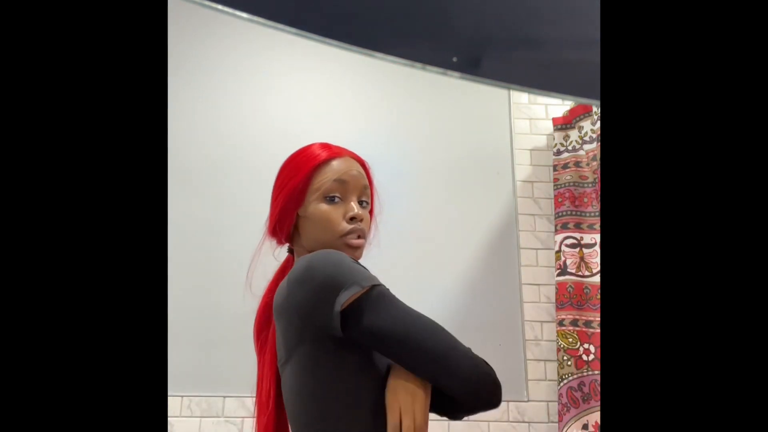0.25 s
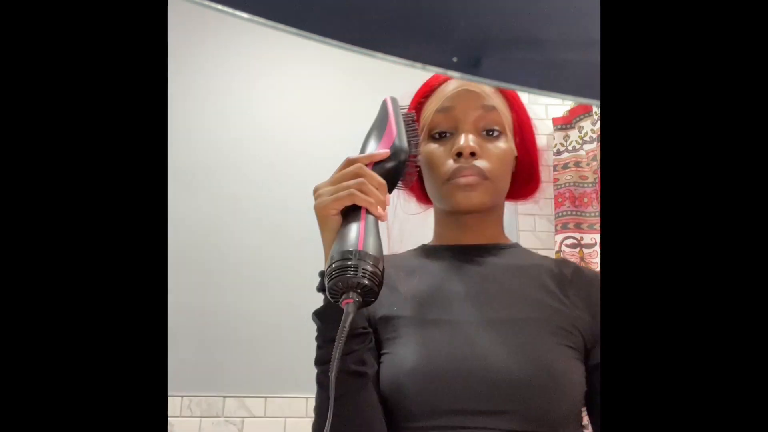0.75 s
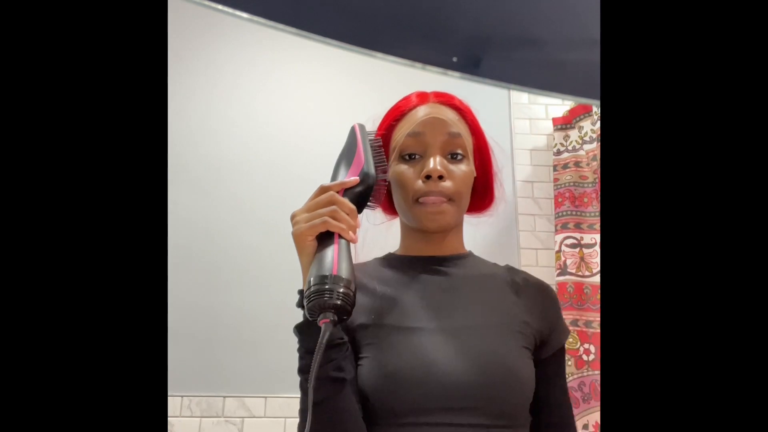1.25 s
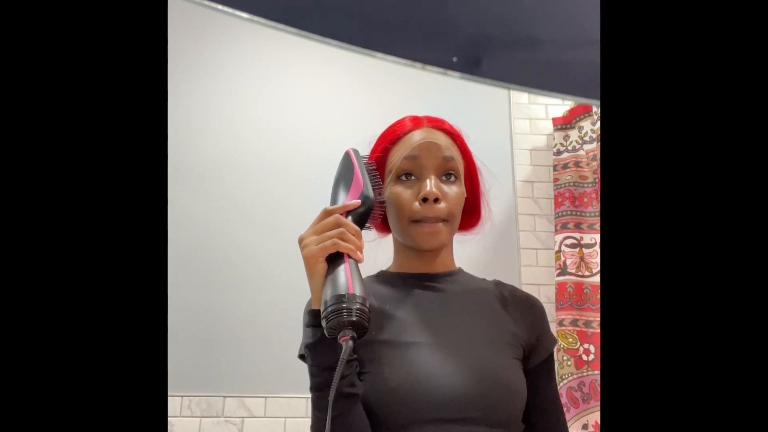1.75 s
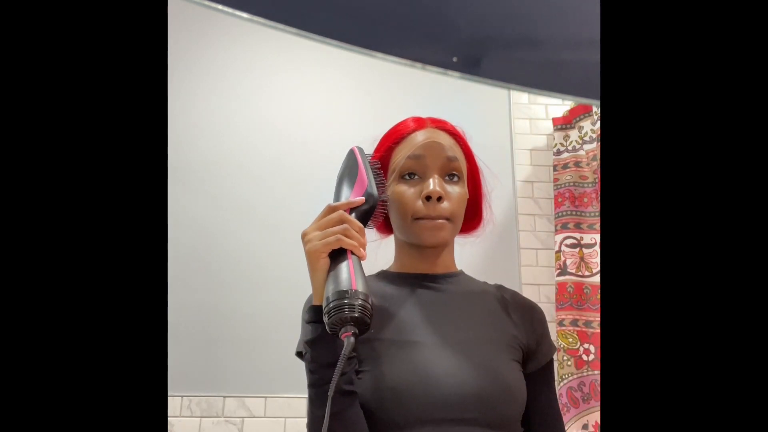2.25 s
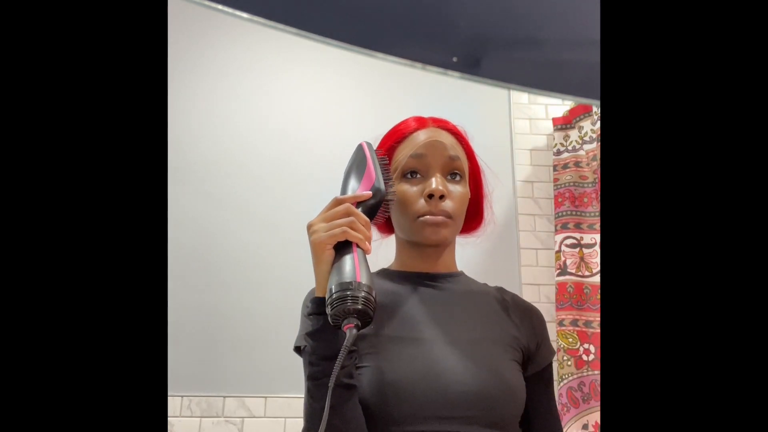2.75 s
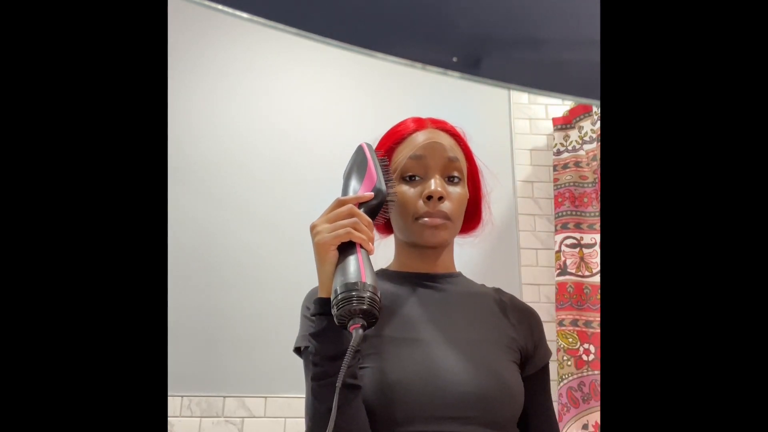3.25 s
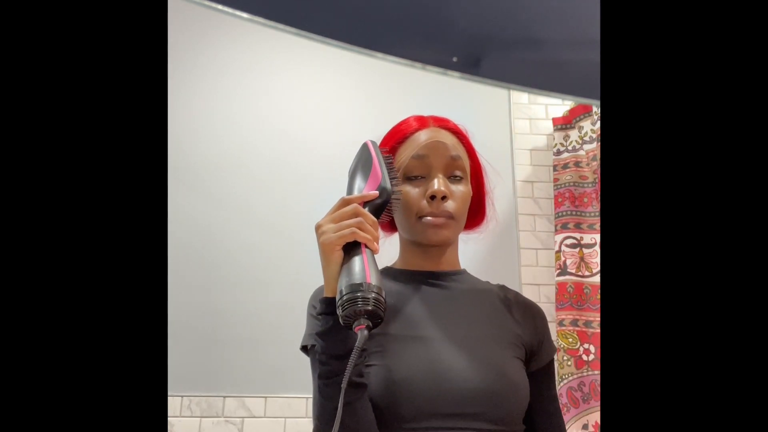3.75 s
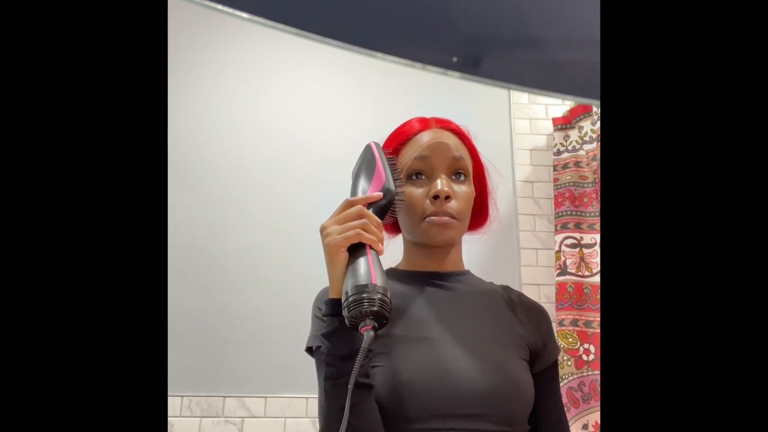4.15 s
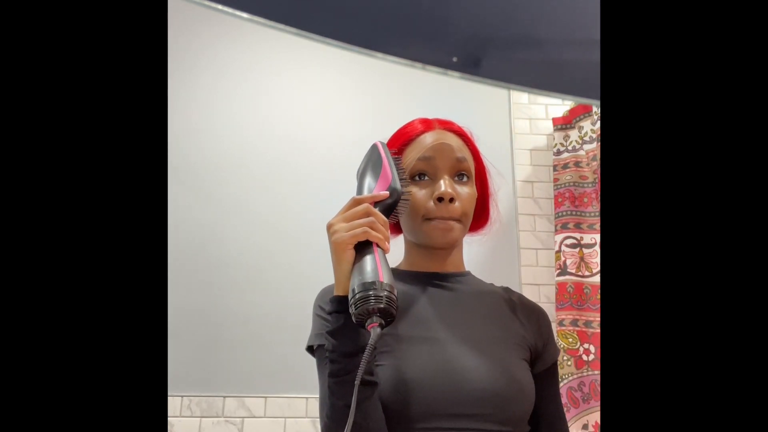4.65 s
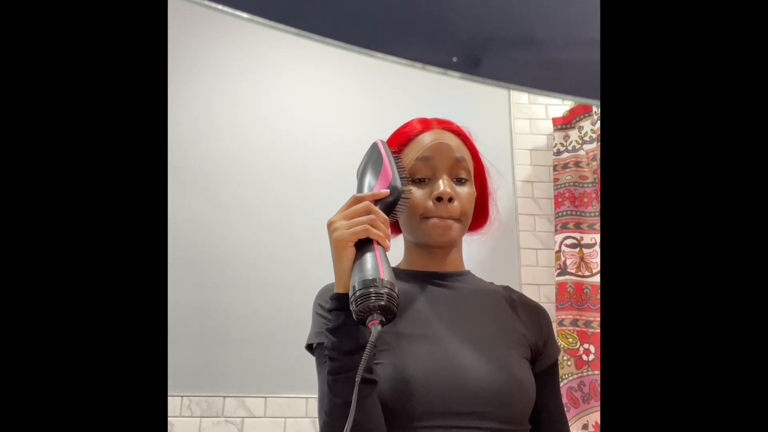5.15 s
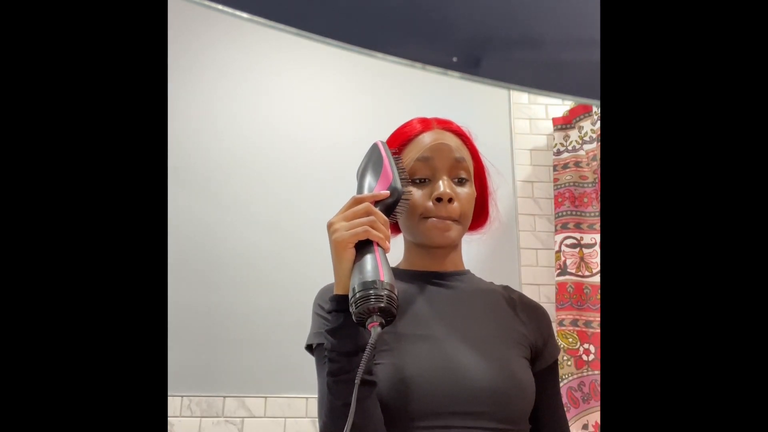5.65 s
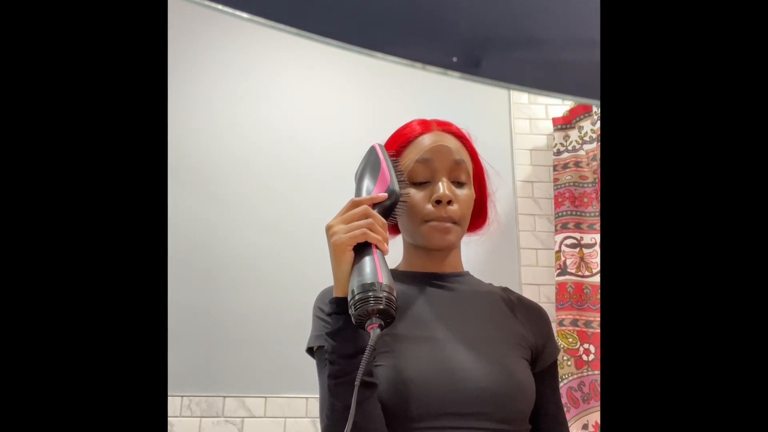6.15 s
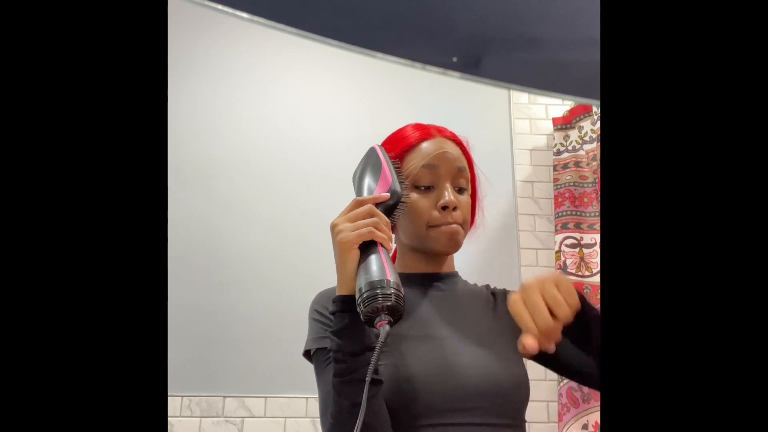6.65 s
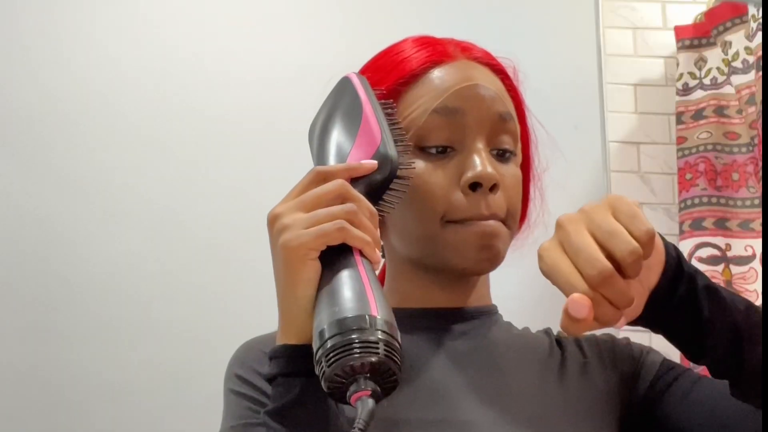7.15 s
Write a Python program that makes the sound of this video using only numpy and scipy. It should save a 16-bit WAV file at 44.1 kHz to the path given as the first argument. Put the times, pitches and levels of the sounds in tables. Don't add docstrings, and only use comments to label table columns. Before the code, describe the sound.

From 0 to about 0.8 s a small tiled bathroom is very quiet: low rumble, a dull murmur off the walls, a faint distant fan hum, a sleeve rubbing around 0.1-0.3 s, and soft handling knocks near 0.3 and 0.5 s. At 0.8 s the sound dips and cuts sharply to a hot air brush already running, vastly louder, about a metre from a stereo microphone. Broad turbulent air, strongest around 2-4 kHz, rushes steadily with slight flutter and hollow, tiled colouring. A motor tone near 515 Hz, a midrange overtone and a blade whine near 3.6 kHz ride on it, wavering slightly. The whine sharpens after 1.2 s; a higher tone flares around 1.4 and 6 s. From about 6 to 6.9 s the blade whine recedes as the brush turns, then partly returns. Blowing continues through the end, about 7.4 s.

```python
import sys
import numpy as np
from scipy import signal
from scipy.io import wavfile
from scipy.ndimage import uniform_filter1d

SR = 44100
rng = np.random.default_rng(int(sys.argv[2]) if len(sys.argv) > 2 else 0)


def decibels_to_gain(level_db):
    exponent = np.asarray(level_db, float) / 20
    return 10 ** exponent


def inscribe(sig):
    pcm = np.round(np.clip(np.atleast_2d(sig).T, -1, 1) * 32767)
    wavfile.write(sys.argv[1], SR, pcm.astype(np.int16))


N = 326781

CUT_S = 0.786
HOP, SIZE = 512, 4096
HZ = np.fft.rfftfreq(SIZE, 1 / SR)
FRAME_S = np.arange(N // HOP + 9) * HOP / SR
# (time [s], facing [0-1])
FACING = [(0.85, 0.55), (1.15, 0.44), (1.22, .85), (2.1, 0.99), (3.2, 0.98), (4.5, 0.74), (5.83, 0.72),
          (5.95, 0.55), (6.5, 0.25), (6.85, 0.2), (7.3, 0.42)]


def evened(x):
    return x / np.sqrt(np.mean(abs(x) ** 2) + 1e-20)


def read(points, hz, axis=1):
    columns = np.transpose(points)
    return np.interp(np.log(hz + 1), np.log(columns[0] + 1), columns[axis])


def along(rows, t):
    s, *columns = np.transpose(rows)
    return [np.interp(t, s, c) for c in columns]


def smoothed(patches, rows, columns):
    return uniform_filter1d(uniform_filter1d(patches, size=rows, axis=0), size=columns, axis=1)


def drift(t, low_hz, high_hz):
    rates_hz = np.geomspace(low_hz, high_hz, num=24)
    return evened(sum(np.sin(2 * np.pi * (f * t + rng.random())) / np.sqrt(f) for f in rates_hz))


def rings_db(modes):
    return sum(db / (1 + (2 * (HZ - hz) / width_hz) ** 2) for hz, width_hz, db in modes)


def swells(rows, t):
    return sum(db * np.exp(-((t - s) / np.where(t < s, rise_s, fall_s)) ** 2) for s, rise_s, fall_s, db in rows)


def pair(centre_db, width_db):
    # (frequency [Hz], likeness [0-1], lead [rad])
    ports = [(200, .3, -2.6), (400, .5, .6), (580, .5, .7), (680, .5, -1.3), (1050, .5, -3.),
             (1300, .45, -.5), (1800, .5, -.7), (2300, .55, -.9), (2750, .3, -2.), (3250, .45, -3.9),
             (6400, .55, -4.5), (9000, .7, -4.7)]
    a, b, c, d = rng.standard_normal((4,) + centre_db.shape)
    like = np.clip(read(ports, HZ), 0, 1)
    turn = np.exp(1j * read(ports, HZ, axis=2))
    centre = a + 1j * b
    side = like * turn * centre + np.sqrt(1 - like ** 2) * (c + 1j * d)
    z = np.array([centre * decibels_to_gain(centre_db), side * decibels_to_gain(width_db)])
    out = signal.istft(z.swapaxes(1, 2), nperseg=SIZE, noverlap=SIZE - HOP)[1][:, :N]
    return out / np.sqrt(np.mean(out[0] ** 2))


def quiet_room():
    # (frequency [Hz], density [dB per Hz])
    rumble_shape = [(20, -14), (40, -8), (70, -2), (98, -10), (130, -1), (165, -8), (206, -11), (268, -7),
                    (322, -18), (450, -20), (700, -40)]
    bump_shape = [(250, -25), (450, -4), (750, -3), (1000, -1), (1250, -1), (1510, 2), (1800, -10),
                  (2500, -32)]
    murmur_shape = [(1200, -21), (1750, -7), (2270, -3), (2600, -7), (3200, -12), (5000, -18), (9000, -37)]
    rustle_shape = [(1500, -25), (2800, -5), (4200, 0), (5500, -2), (8000, -4), (10300, -9), (11200, -25)]
    # (frequency [Hz], level [dB])
    quiet_width = [(60, -14), (110, -15), (190, -9), (350, -10), (620, -3), (1120, -1), (2000, -12),
                   (3600, -2), (6460, -7), (11600, 5)]
    # (rumble [dB], handling bump [dB], tile murmur [dB], sleeve rustle [dB])
    rest_db = (-67, -77.5, -72, -78)
    # (peak time [s], rise [s], fall [s], gain [dB])
    rumbles = [
        (.24, .1, .05, 4),
        (.37, .04, .03, 4),
        (.5, .05, 0.041, 7.5),
        (.72, .1, .03, 3),
    ]
    bumps = [
        (0.0, .01, .05, 10),
        (.322, .02, .03, 8.6),
        (.49, 0.043, .045, 12),
    ]
    murmurs = [
        (0.0, .01, .04, 11.4),
        (.1, .03, 0.077, 9.5),
        (.76, 0.13, .05, 5.5),
    ]
    rustles = [
        (.26, .2, 0.058, 17),
        (.38, .03, .03, 4),
        (.51, .04, .05, 5),
        (.66, .07, .07, -12),
    ]

    patches = rng.standard_normal((90, len(HZ)))
    patches_db = 2.0 * evened(smoothed(patches, 5, 40))
    shapes = (rumble_shape, bump_shape, murmur_shape, rustle_shape)
    fields_db = [read(shape, HZ) + patches_db for shape in shapes]
    layers = [pair(db, db + read(quiet_width, HZ)) for db in fields_db]

    t = np.arange(layers[0].shape[1]) / SR
    moves = (rumbles, bumps, murmurs, rustles)
    levels_db = [db + swells(rows, t) for db, rows in zip(rest_db, moves)]
    hum_hz, hum_db = 380, -79
    hum = decibels_to_gain(hum_db + 3 + 2 * drift(t, 3., 20)) * np.sin(2 * np.pi * hum_hz * t)
    room = hum * np.array([[1], [.3]])
    room = room + sum(layer * decibels_to_gain(db) for layer, db in zip(layers, levels_db))
    return np.pad(room, ((0, 0), (0, N - len(t))))


def air():
    # (frequency [Hz], density [dB per Hz])
    rush_shape = [(30, -42), (60, -35), (110, -29.5), (200, -23.5), (320, -16.5), (450, -24.5), (800, -13),
                  (1300, -12.5), (2000, -3.5), (2800, 0.5), (3700, -5.5), (4800, -13), (8500, -15.5),
                  (11000, -22)]
    # (frequency [Hz], density against the loudest part of the rush [dB per Hz])
    rush_width = [(30, -71.9), (100, -55.4), (250, -38.3), (420, -29.9), (520, -23.2), (800, -12.7),
                  (1500, -18.7), (2400, -14.2), (3450, -13.5), (6350, -19.6), (8000, -17.9), (10500, -16.9),
                  (13000, -19.6), (15800, -26.6)]
    # (frequency [Hz], width [Hz], gain [dB])
    tiles = [(117, 22, 11.0), (157, 14, -4.3), (315, 45, -9.5), (420, 65, 10.6), (469, 14, 5.5),
             (590, 167, 9.6), (636, 17, 7.4), (699, 24, 6.3), (720, 48, -7.6), (769, 28, -11.0),
             (818, 30, -8.6), (818, 108, 10.8), (923, 24, -9.4), (971, 17, -4.5), (1029, 47, 10.9),
             (1064, 44, -7.5), (1189, 18, 11.0), (1189, 50, -5.0), (1237, 15, 5.4), (1314, 38, 4.3),
             (1440, 24, 2.9), (1487, 15, 3.7), (1526, 14, 7.6), (1626, 21, -3.3), (1717, 28, -6.3),
             (1848, 52, -3.2), (1902, 14, 3.4), (1951, 14, 3.8)]
    barrel = [(2103, 20, 5), (2164, 96, -5.9), (2336, 393, 6.1), (2471, 238, -10.7), (2494, 60, 11),
              (2564, 95, -7), (2575, 38, 8.9), (2800, 31, -5.4), (2899, 31, 6.2), (2953, 127, -11),
              (3046, 15, 4.2), (3136, 124, -7.5), (3174, 35, 8.3), (3235, 24, -5.3), (3348, 31, 9.1),
              (3485, 352, -7.2), (3504, 42, 5), (3608, 40, 5.5), (3694, 238, -4.9), (3811, 55, 3),
              (4172, 46, 2.6), (4459, 158, 6.3), (4673, 112, 4.5), (5150, 300, -2.5), (5470, 200, 5.6),
              (5640, 90, 4), (6350, 80, -2), (6690, 100, 2)]
    port_rings = [(471, 36, -6.4), (540, 26, 9.1), (620, 20, -5.5), (663, 24, 2.1), (802, 33, 5.1),
                  (871, 242, -7.8), (1080, 37, 2.4), (1162, 66, 6.4), (1239, 46, -2.3), (1660, 46, -8.8),
                  (1671, 106, 11.0), (2170, 133, 4.5), (2271, 62, -3.7), (2454, 84, -7.9), (2517, 71, 5.4),
                  (2573, 34, 8.6), (2670, 58, -5.8), (2692, 53, 10.7), (2759, 61, 5.1), (2845, 44, 4.8),
                  (2944, 90, -2.7), (3183, 23, 2.4), (3321, 20, 3.5), (3458, 20, -10.9)]
    # (frequency [Hz], width [Hz], gain [dB] per unit the facing falls below 0.7,
    # reversed above it)
    turned_rings = [(2120, 160, 6.5), (2330, 150, 0), (2640, 250, 0.5), (3430, 60, -4)]

    patches = rng.standard_normal((len(FRAME_S), len(HZ)))
    wander = evened(smoothed(patches, 30, 6))
    eddies = evened(smoothed(patches[::-1], 5, 60))
    hiss_db = 0.34 * (HZ > 5000)
    turned = (.7 - along(FACING, FRAME_S)[0])[:, None]
    field_db = 1.87 * wander + 0.59 * eddies + hiss_db + turned * rings_db(turned_rings)
    centre_db = read(rush_shape, HZ) + rings_db([*tiles, *barrel]) + field_db
    width_db = read(rush_width, HZ) + 0.1 + rings_db(port_rings) + field_db
    rush = pair(centre_db, width_db)

    t = np.arange(N) / SR
    flutter_db = .5 * drift(t, 4.5, 70)
    return rush * decibels_to_gain(-24.02 + flutter_db)


def whine():
    # (time [s], speed [Hz])
    shaft_speed = [(0.95, 516.0), (1.3, 515.7), (1.65, 514.6), (3.9, 514.7), (4.3, 515.0), (4.9, 515.1),
                   (5.3, 514.6), (5.7, 514.9), (6.1, 514.5), (7.0, 514.9)]
    # (level when facing squarely [dB], loss when turned fully away [dB])
    faced_tones = [
        (-41, 4.5),
        (-37, 1),
        (-30.5, 15.0),
        (-55, -5),
    ]
    # (multiple of shaft, level [dB], lead [rad])
    side_tones = [
        (1, -46.5, .5),
        (3, -48.5, -.4),
        (7, -52, 0),
        (14, -55, 1.6),
    ]
    # (multiple of shaft, centre [dB], difference [dB], lead [rad])
    faint_orders = [(2, -55, -47, 3.1), (5, -60, -50, -1.5), (8, -46, -70, 0), (11, -55, -70, 0),
                    (18, -60, -56, 1.6), (19, -63, -55, 1.6), (21, -60, -49, 1.6), (28, -70, -60, 1.6)]
    # (time [s], half length [s], gain [dB])
    flares = [
        (1.37, .13, 14),
        (2.9, .3, 5),
        (4.1, .3, 4),
        (6.0, 0.24, 12),
        (7.3, .25, 10),
    ]
    press_s, press_rise_s, loose_db = 1.4, 0.73, -7
    ease_s, ease_db_per_s = 6.6, -2.5

    t = np.arange(N) / SR
    shaft_hz = along(shaft_speed, t)[0]
    away = 1 - along(FACING, t)[0]
    shaft, third, blade, second = [db - lost_db * away for db, lost_db in faced_tones]
    loose = np.clip(1 - (t - press_s) / press_rise_s, 0, 1)
    third = third + loose_db * loose + ease_db_per_s * np.maximum(t - ease_s, 0)
    second = second + swells([(s, half_s, half_s, db) for s, half_s, db in flares], t)
    tones_db = shaft, third, blade, second

    turns = np.cumsum(shaft_hz + 0.42 * drift(t, 3., 40)) / SR
    main = [(k, db, side_db, lead) for (k, side_db, lead), db in zip(side_tones, tones_db)]
    out = np.zeros((2, N))
    for k, db, side_db, lead in [*main, *faint_orders]:
        swell_db = 1.2 * drift(t[::64], 2.5, 25).repeat(64)[:N]
        angle = 2 * np.pi * (k * turns + rng.random())
        out[0] += decibels_to_gain(db + 3 + swell_db) * np.sin(angle)
        out[1] += decibels_to_gain(side_db + 1 + .5 * swell_db) * np.sin(angle + lead)
    return out


def scene():
    fade_out_s, fade_in_s = 0.023, 0.034
    t = np.arange(N) / SR
    before = np.clip((CUT_S - t) / fade_out_s, 0, 1)
    after = np.clip((t - CUT_S) / fade_in_s, 0, 1)
    centre, side = before * quiet_room() + after * (air() + whine())
    return np.array([centre + side, centre - side])


def dropouts(both):
    # (frequency [Hz], centre, difference)
    margins = [(3400, 6, 6), (3440, 6, 3), (3470, 6, -2), (3600, 6, -.9), (3750, 6, -2.8), (5000, 6, -2.8),
               (5300, 6, -1.5), (6150, 6, -1.2), (6250, 6, 2.4), (7600, 6, 4), (10000, 4, 5),
               (10900, 1.8, 5), (11000, 0, 5), (11550, -.3, 5), (11750, -2.5, 5), (12400, -3.2, 4),
               (12500, -9, 3), (13500, -9, 1.6), (13700, -9, .6), (14500, -9, .4), (14600, -9, -.4),
               (15700, -9, -.8), (15850, -9, -9)]
    # (time [s], loss)
    losses = [
        (0, 1.8),
        (.8, 1.5),
        (.9, 2.8),
        (1.7, 2.6),
        (2.3, .8),
        (2.7, 0),
        (7.41, 0),
    ]
    full_s, full_half_s, top_db = 4.853, .009, -9

    hz, t, z = signal.stft(both, SR, nperseg=1024, noverlap=768)
    for channel in (0, 1):
        is_centre = 1 - channel
        chance = rng.standard_normal((len(hz) // 4 + 1, len(t) // 4 + 1))
        chance = evened(uniform_filter1d(chance, size=2, axis=1) + 2.5 * smoothed(chance, 9, 3))
        chance = chance.repeat(4, 0).repeat(4, 1)[:len(hz), :len(t)]
        margin = read(margins, hz, axis=1 + channel)[:, None]
        share = np.select([hz < 5100, hz < 6200, hz < 7700], [0, -.3, 1], .25)[:, None]
        lost = along(losses, t)[0] * share
        spare = 3.2 * (t < CUT_S + .02) * ((hz > 3400) & (hz < 6200))[:, None]
        whole = ((hz < 12500) | (hz > 15000))[:, None]
        spare = spare + 20 * (abs(t - full_s) < full_half_s) * whole * is_centre
        z[channel] *= decibels_to_gain(top_db * (hz > 12500) * is_centre)[:, None]
        z[channel] *= chance < margin - lost + spare
    return signal.istft(z, SR, nperseg=1024, noverlap=768)[1][:, :N]


def band_limit(x):
    return signal.sosfilt(signal.butter(12, 15900, fs=SR, output="sos"), x)


def record(dry):
    both = np.array([dry[0] + dry[1], dry[0] - dry[1]]) / 2
    centre, side = dropouts(both)
    return band_limit(np.array([centre + side, centre - side]))


dry = scene()
out = record(dry)
inscribe(out)
```